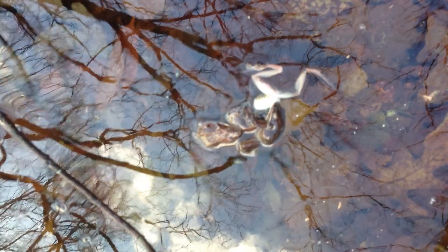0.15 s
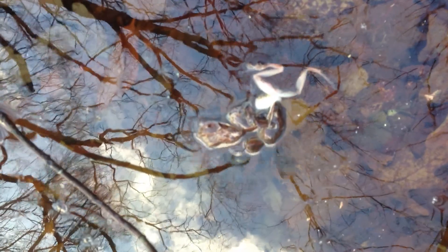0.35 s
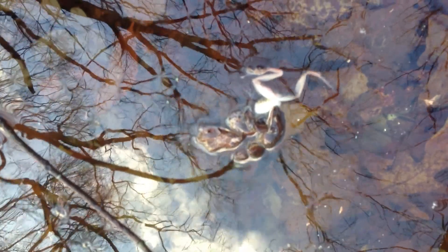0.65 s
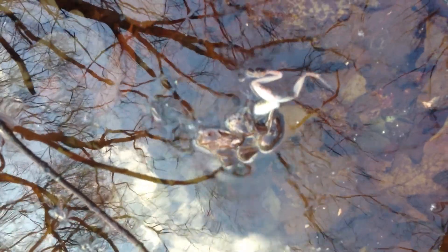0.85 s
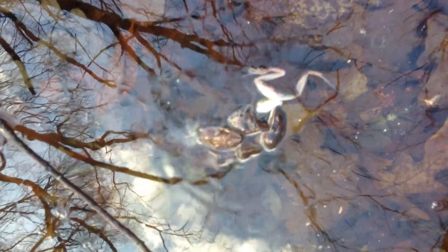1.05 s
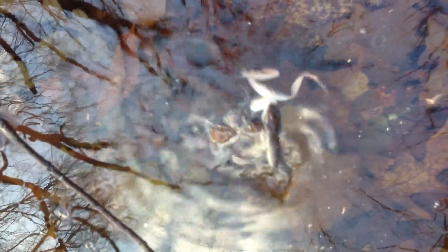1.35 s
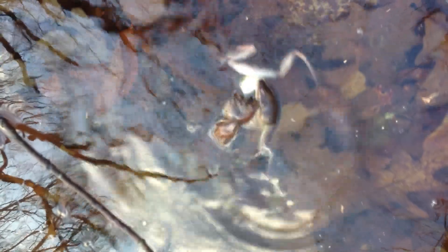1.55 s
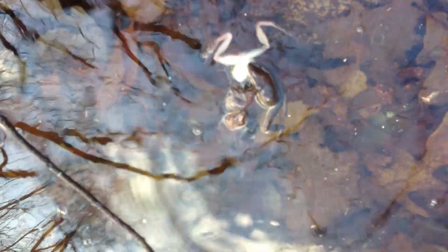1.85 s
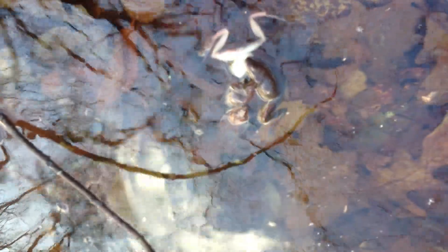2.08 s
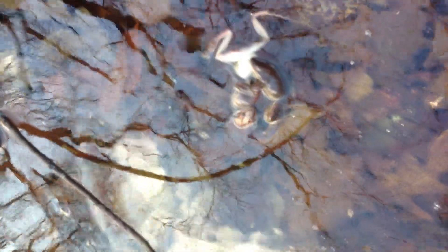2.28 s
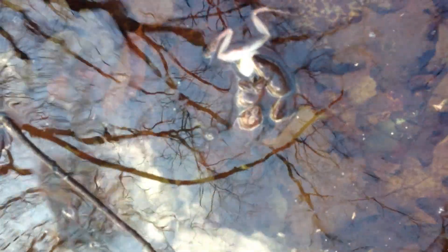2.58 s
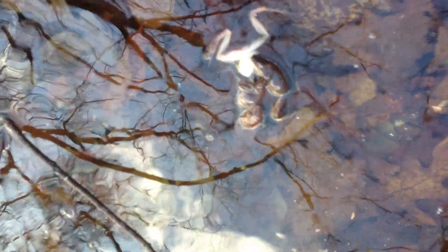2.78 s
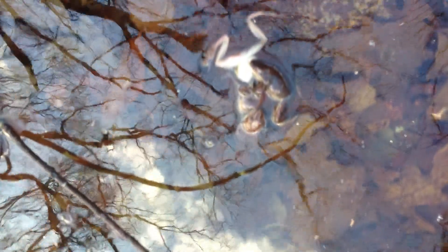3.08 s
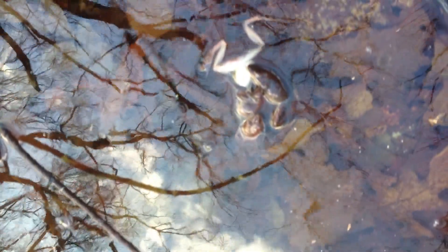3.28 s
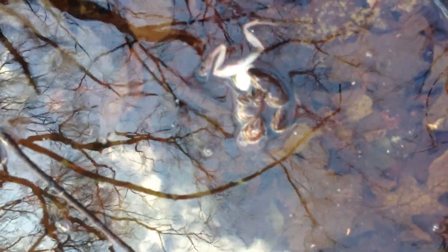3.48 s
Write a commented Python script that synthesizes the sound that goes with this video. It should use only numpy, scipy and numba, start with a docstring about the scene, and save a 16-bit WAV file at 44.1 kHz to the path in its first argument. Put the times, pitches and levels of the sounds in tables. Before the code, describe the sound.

Wood frogs quack in a dense, continuous chorus around a shallow woodland pool, with a brief splash.

```python
"""Wood frogs quack all round a shallow woodland pool: each quack is a brief, swelling run of pulses
driven through gliding throat resonances. A few calls are higher chirps, and some carry thin falling squeaks.
Far quacks overlap into a wash among the trees. Tussling frogs kick up brief plops and spray of filtered
noise, and some droplets tick. A faint rumble and hiss of coloured noise lies underneath."""
import sys
import numpy as np
from scipy import signal
from scipy.fft import rfft, irfft, next_fast_len
from scipy.io import wavfile
from scipy.ndimage import uniform_filter1d
from numba import njit

SR = 44100
rng = np.random.default_rng(int(sys.argv[2]) if len(sys.argv) > 2 else 0)


def generate_wav(signal):
    """Clip the signal to [-1, 1] and save it as 16-bit WAV at the path in sys.argv[1]."""
    frames = np.transpose(np.atleast_2d(signal))
    scaled = np.clip(frames, -1, 1) * 32767
    pcm = np.round(scaled).astype(np.int16)
    wavfile.write(sys.argv[1], SR, pcm)


N = 160083
TIME = np.arange(N) / SR


def from_db(db):
    """Decibels to gain."""
    return 10 ** (np.asarray(db) / 20)


def rms_one(x):
    """Scale to unit rms."""
    return x / np.sqrt(np.mean(x ** 2) + 1e-20)


def add(out, start_s, sound):
    """Mix a sound in from its start time, trimming what falls outside the scene."""
    start = int(start_s * SR)
    first, end = max(start, 0), min(start + len(sound), N)
    if end > first:
        out[first:end] += sound[first - start:end - start]


def colour(x, points):
    """Smooth equaliser through (frequency [Hz], gain [dB]) points, on a log-frequency axis."""
    hz, db = np.transpose(points)
    size = next_fast_len(len(x) + 2048, True)
    freq = np.arange(size // 2 + 1) * SR / size + 1   # 1 Hz up, to keep the log finite
    gain = from_db(np.interp(np.log(freq), np.log(hz), db))
    return irfft(rfft(x, size) * gain, size)[:len(x)]


@njit
def resonate(x, turn, r):
    """A two-pole resonance whose centre (radians per sample) may move; r sets its decay."""
    y, z = np.zeros(len(x)), 0j
    for i in range(len(x)):
        z = z * r * complex(np.cos(turn[i]), np.sin(turn[i])) + x[i]
        y[i] = z.imag
    return y


def decay_per_sample(width_hz):
    """A wider resonance dies away faster."""
    return np.exp(-np.pi * width_hz / SR)


def ring(x, hz, width_hz):
    """Ring a resonance of given centre and width."""
    return resonate(x, 2 * np.pi * hz / SR * np.ones(len(x)), decay_per_sample(width_hz))


def throb(drive, hz, width_hz):
    """A tone that keeps its phase while each pulse makes it jump in level and die back; unit rms."""
    level = signal.lfilter([1], [1, -decay_per_sample(width_hz)], drive)
    smooth_level = uniform_filter1d(level, int(SR / np.mean(hz)))   # over one cycle of the tone
    return rms_one(smooth_level * np.sin(2 * np.pi * np.cumsum(hz) / SR))


PEAK_SHARE, SWELL_POWER = 0.55, 0.85   # where in a call it is loudest; sharpness of its swell
RASP = 0.024                           # noise between pulses
SLOW_PULSES_PER_S, FAST_PULSES_PER_S, JITTER = 135, 430, 0.14


def pulse_run(length_s, fastest=FAST_PULSES_PER_S):
    """Uneven pulses, faster as they swell and slower as they fade; also progress 0-1 and rms of the swell."""
    noise = rng.standard_normal(SR // 4)
    gap_chance, level_chance = rng.standard_normal((2, 128))
    size = int((length_s + 0.01) * SR)
    progress = np.minimum(TIME[:size] / length_s, 1)
    arch = np.interp(progress, [0, PEAK_SHARE, 1], [0, 0.5, 1])
    swell = np.abs(np.sin(np.pi * arch)) ** SWELL_POWER
    rate = SLOW_PULSES_PER_S + (fastest - SLOW_PULSES_PER_S) * swell ** 2
    gaps = np.maximum(1 + JITTER * gap_chance, 0.5)
    at = np.searchsorted(np.cumsum(rate) / SR, np.cumsum(gaps) - 0.5)
    pulses = np.zeros(size + 1)   # the spare last place takes pulses past the end
    pulses[at] = from_db(1.02 * level_chance)
    # dividing by root rate stops faster pulses from adding loudness
    drive = (pulses[:size] + RASP * noise[:size]) * swell / np.sqrt(rate)
    return drive, progress, np.sqrt(np.mean(swell ** 2))


# Distant rumble and hiss: (frequency [Hz], relative spectral level [dB])
RUMBLE_AND_HISS = [(22,-41),(60,-26),(120,-9.5),(240,-1.5),(335,3.5),(430,-4),(3000,-13.5),(7000,-21),(15000,-22.5)]
BACKGROUND_DB = -60.5   # rms


def background():
    """Steady low rumble and hiss: noise given a fixed spectral slope."""
    return from_db(BACKGROUND_DB) * rms_one(colour(rng.standard_normal(N), RUMBLE_AND_HISS))


WOODS_T60_S, ECHOES_PER_S = 0.46, 900


def woods(x):
    """Scattered echoes from trunks and banks, dying away."""
    t = TIME[:SR]
    sparse = rng.standard_normal(SR) * (rng.random(SR) < ECHOES_PER_S / SR)
    echoes = sparse * from_db(-60 * t / WOODS_T60_S) * (t > 0.008)
    return signal.fftconvolve(x, echoes / np.sqrt(np.sum(echoes ** 2)))[:N]


# Air pockets closing in the splash:
# (start [s], length [s], level before the band filter [dB], start pitch [Hz], end pitch [Hz])
PLOPS = [(1.216,0.021,-39,696,662),(1.408,0.022,-41,606,556),(1.427,0.0225,-37,625,710)]
PLOP_WIDTH_HZ = 140


def plops():
    """Closing air pockets: a throbbing tone on a pulse run, gliding in pitch."""
    out = np.zeros(N)
    for start_s, length_s, db, start_hz, end_hz in PLOPS:
        drive, progress, strength = pulse_run(length_s)
        gurgle = throb(drive, start_hz + (end_hz - start_hz) * progress, PLOP_WIDTH_HZ)
        no_thump = signal.butter(2, [0.77 * start_hz, 2 * start_hz], "band", fs=SR, output="sos")
        add(out, start_s, from_db(db) * strength * signal.sosfilt(no_thump, gurgle))
    return out


# Spray thrown by a kick: (start [s], length [s], level at the crest [dB])
SPRAY = [(1.188,0.06,-49.5),(1.308,0.016,-46),(1.387,.054,-54)]
# Colour of the patter: (frequency [Hz], gain [dB])
SPRAY_COLOUR = [(400,-33),(1200,-11),(2000,3.5),(3100,-4.5),(4200,-12),(8000,-43)]
SPRAY_DROPS_PER_S = 1800


def spray():
    """Random drop clicks, coloured and let through in brief swells."""
    swells = np.zeros(N)
    for start_s, length_s, db in SPRAY:
        add(swells, start_s, from_db(db) * np.hanning(int(length_s * SR)))
    drops = rng.standard_normal(N) * (rng.random(N) < SPRAY_DROPS_PER_S / SR)
    return swells * rms_one(colour(drops, SPRAY_COLOUR))


# Single droplets: (start [s], peak level [dB], centre [Hz], width [Hz])
DROPLETS = [(3.223,-46.5,6050,1460),(3.264,-53,9400,1490),(3.309,-42,4100,1300)]


def droplets():
    """Ticks: a noise burst fading in milliseconds rings one high resonance."""
    out, t = np.zeros(N), TIME[:SR // 20]
    for start_s, db, hz, width_hz in DROPLETS:
        tick = ring(rng.standard_normal(len(t)) * np.exp(-t / 0.0021), hz, width_hz)
        add(out, start_s, from_db(db) * tick / np.abs(tick).max())
    return out


def splash():
    """Low, gurgling plops, a patter of spray and single droplets."""
    return plops() + spray() + droplets()


CHIRP_CLEAN = 0.13   # share of steady tone in a chirp's main resonance
CLEAN_DULLS_DB = 3   # a clean call gives this much less to its side resonances than a rough one


def call(throat, length_s, main_hz, low_db=0, clean=CHIRP_CLEAN, treble_db=0, fastest=FAST_PULSES_PER_S):
    """Pulses in gliding throat resonances; in a clean call the main one holds a throbbing tone."""
    drive, progress, strength = pulse_run(length_s, fastest)
    usual_main_hz = throat[1][0]
    out = 0
    for k, (hz, width_hz, db, glide_oct, gained_db) in enumerate(throat):
        # the low resonance follows the call's pitch only half as far
        shift = (main_hz / usual_main_hz) ** (1 if k else 0.5)
        centre = hz * shift * 2 ** (glide_oct * (progress - 0.5))
        push = drive * from_db(gained_db * progress)
        voice = rms_one(ring(push, centre, width_hz))
        if k == 0:
            db = db + low_db
        elif k == 1:
            tone = throb(push, centre, width_hz)
            voice = rms_one(np.sqrt(1 - clean) * voice + np.sqrt(clean) * tone)
        else:
            db = db + treble_db * (hz > usual_main_hz) - CLEAN_DULLS_DB * (clean - 0.5)
        out = out + (-1) ** k * from_db(db) * voice   # alternate signs between resonances
    return out * strength


# Throat of a quack, low resonance first and main one second, before each call's own pitch and balance:
# (centre in mid-call [Hz], width [Hz], level [dB], glide over the call [octaves], gain over the call [dB])
QUACK_THROAT = [(784,132,-8.5,-0.1,7.5),(1660,234,0,-0.0902,5),(1296,126,-15,-0.51,8),(2340,1140,-19,-0.58,-20),(4760,2300,-39,-0.42,-7)]
# The far chorus: (time [s], level [dB])
FAR_LEVEL = [(0,-42.5),(.8,-43.5),(.89,-46.5),(.97,-45.5),(1.06,-42.5),(1.9,-44),(2.2,-45),(2.38,-43.5),(2.43,-46.5),(2.52,-43.5),(2.78,-45),(2.84,-49),(2.95,-43.5),(3.18,-47.5),(3.35,-43),(3.63,-43)]
# Colour of the long path over water and leaves: (frequency [Hz], gain [dB])
FAR_PATH = [(300,-15),(580,-1),(760,-4),(1050,-2.5),(1800,-1),(2450,-1.5),(3800,-10.5),(5300,-2),(7000,-16),(12000,-22)]
FAR_PER_S, FAR_SPREAD_DB, FAR_LENGTH_S = 55, 1, 0.045
FAR_HZ, FAR_SPREAD_OCT = 1652.4, 0.119
FAR_LOW_DB, FAR_WET_DB = 3.5, -2.5   # lift of the low resonance; echoes from the woods


def far_frogs():
    """The rest of the pool: the same quack from many throats, overlapping and echoing."""
    out, count = np.zeros(N), int(FAR_PER_S * N / SR)
    spacing_s = (N / SR + FAR_LENGTH_S) / count
    chances = np.clip(rng.standard_normal((count, 4)), -2, 2)
    for k, (late, loud, long, pitch) in enumerate(chances):
        length_s = FAR_LENGTH_S * 1.2 ** long
        main_hz = FAR_HZ * 2 ** (FAR_SPREAD_OCT * pitch)
        quack = call(QUACK_THROAT, length_s, main_hz, FAR_LOW_DB, clean=0)
        start_s = (k + late * 0.5) * spacing_s - FAR_LENGTH_S
        add(out, start_s, from_db(FAR_SPREAD_DB * loud) * quack)
    chorus = rms_one(colour(out + from_db(FAR_WET_DB) * woods(out), FAR_PATH))
    return chorus * from_db(np.interp(TIME, *np.transpose(FAR_LEVEL)))


# Thin squeaks above some calls, levels before the near path:
# (loudest moment [s], length [s], level [dB], mid-squeak pitch [Hz])
SQUEAKS = [(.352,0.1,-60,5540),(.417,0.023,-57.5,5860),(.448,0.049,-61,5300),(.6,.13,-67,4960),(.797,0.059,-62,4430),
           (1.279,0.037,-56.5,5840),(1.303,0.025,-55.5,5350),(1.326,.024,-48,4780),(2.023,0.053,-60,4480),(2.628,0.063,-62.5,5540),(3.083,0.039,-63.5,5230),(3.336,.052,-59,4600)]
SQUEAK_PULSES_PER_S, SQUEAK_WIDTH_HZ, SQUEAK_FALL_OCT_PER_S = 140, 200, 2.1


def squeaks():
    """Pulses ring one narrow, falling resonance."""
    out = np.zeros(N)
    for loudest_s, length_s, db, hz in SQUEAKS:
        drive, progress, strength = pulse_run(length_s, SQUEAK_PULSES_PER_S)
        centre = hz * 2 ** (-SQUEAK_FALL_OCT_PER_S * length_s * (progress - 0.5))
        squeak = strength * rms_one(ring(drive, centre, SQUEAK_WIDTH_HZ))
        add(out, loudest_s - PEAK_SHARE * length_s, from_db(db) * squeak)
    return out


TYPICAL_DB, TREBLE_PER_DB = -33.5, 1.1   # louder calls are closer, and so brighter


def near_calls(rows, throat, fastest):
    """Place calls so that each swells to its loudest moment on time."""
    out = np.zeros(N)
    for loudest_s, length_s, db, *voice in rows:
        treble_db = TREBLE_PER_DB * (db - TYPICAL_DB)
        sound = call(throat, length_s, *voice, treble_db=treble_db, fastest=fastest)
        add(out, loudest_s - PEAK_SHARE * length_s, from_db(db) * sound)
    return out


# Higher chirps, levels before the near path:
# (loudest moment [s], length [s], level [dB], main resonance [Hz])
CHIRPS = [(0.668,0.052,-41.5,2220),(1.326,.036,-30.5,2117),(1.714,.065,-41.5,2280),(1.93,0.04,-41.5,2080),(3.052,0.026,-43,2060)]
# Throat of a chirp, low resonance first and main one second, before each call's own pitch and balance:
# (centre in mid-call [Hz], width [Hz], level [dB], glide over the call [octaves], gain over the call [dB])
CHIRP_THROAT = [(850,390,-6,-0.013,-7),(2170,195,-1,0.15,1),(1840,280,-15,0,-4),(2850,490,-14,-0.014,-21),(3760,350,-24,-0.16,-13)]
CHIRP_PULSES_PER_S = 620   # at the fastest


def chirps():
    """Higher calls: faster pulses through a higher-tuned throat."""
    return near_calls(CHIRPS, CHIRP_THROAT, CHIRP_PULSES_PER_S)


# Near quacks, levels before the near path: (loudest moment [s], length [s], level [dB],
# main resonance [Hz], lift of the low resonance [dB], clean tone [0-1])
QUACKS = [(0.018,0.044,-35.5,1592,0.5,0.75),(0.082,.082,-37,1655,-3.5,0.76),(0.247,0.061,-38,1700,0.5,0.3),(0.298,0.043,-38,1780,-6,0.35),(0.385,.039,-30.5,1738,-6,0.98),
          (0.435,0.06,-44,1732,3,0.87),(0.485,0.063,-39.5,1725,-3,0.9),(0.565,0.051,-35,1680,-2.5,0.54),(.641,0.038,-36.5,1541,-13,.7),(0.702,0.032,-36.5,1568,1,0.47),
          (0.81,0.064,-40,1530,3.5,0.6),(0.937,.013,-33.5,1602,-5,0.9),(1.018,0.04,-35.5,1620,-1,0.3),(1.061,0.057,-42,1708,-20,0.4),(1.168,0.061,-45,1650,1,1),
          (1.239,0.03,-36,1388,-7,0.86),(1.3,0.03,-33,1655,-6,0.8),(1.364,0.049,-44,1670,7.5,0.4),(1.487,0.039,-37.5,1700,-0.5,0.37),(1.544,0.029,-43.5,1525,5.5,0.8),
          (1.652,.04,-37,1660,2.5,0.2),(1.753,0.052,-42,1610,-3,0.6),(1.873,.06,-36,1640,1,0),(1.956,0.032,-38,1723,-8,0.92),(1.984,.02,-40,1657,0,.9),
          (2.036,0.044,-35,1625,1,0.98),(2.117,0.072,-41.5,1627,3,0),(2.32,0.08,-40,1660,-8,0.27),(2.482,0.033,-36.5,1603,-14,0.65),(2.511,0.045,-40.5,1780,-4,0),
          (2.581,0.033,-35,1660,0.5,0),(2.639,0.035,-35.5,1781,1.5,0.3),(2.667,0.037,-38,1702,0,.1),(2.779,0.081,-41.5,1484,4.5,0.4),(2.876,.044,-37.5,1550,2,0.3),
          (2.972,0.04,-38.5,1720,-4,0.37),(3.014,0.036,-38.5,1614,-11,0.83),(3.089,0.043,-37,1760,-9,0.4),(3.128,0.034,-36.5,1500,2.5,0.02),(3.239,0.051,-43,1500,1,.4),
          (3.345,.044,-34,1702,2.5,0.33),(3.406,0.049,-38,1590,2,0.45),(3.455,0.08,-38,1670,2.5,0.35),(3.542,0.042,-37,1700,-0.5,0.5),(3.61,0.069,-37.5,1560,2.5,0.4)]


def quacks():
    """Swelling pulse runs in a gliding throat, from rough to clean."""
    return near_calls(QUACKS, QUACK_THROAT, FAST_PULSES_PER_S)


# Colour of the short path over water and leaves: (frequency [Hz], gain [dB])
NEAR_PATH = [(300,-38),(600,-5.5),(790,-3.5),(1070,-3.5),(1700,-4.5),(2450,0.5),(3800,-7.5),(5300,-4.5),(7500,-15),(12000,-24)]
NEAR_WET_DB, SQUEAK_WET_DB = -7.5, -8   # echoes from the woods


def near_frogs():
    """Quacks, chirps and squeaks from the frogs close by, with their echoes."""
    calls, high = quacks() + chirps(), squeaks()
    echoes = woods(from_db(NEAR_WET_DB) * calls + from_db(SQUEAK_WET_DB) * high)
    return colour(calls + high + echoes, NEAR_PATH)


def scene():
    """Everything at one microphone above the pool."""
    return (background() + splash() + far_frogs() + near_frogs())[None]


CUTOFF_HZ = 15250


def record(dry):
    """The top is cut steeply by an elliptic low-pass."""
    return signal.sosfilt(signal.ellip(12, 0.1, 70, CUTOFF_HZ, fs=SR, output="sos"), dry)


dry = scene()
out = record(dry)
generate_wav(out)
```